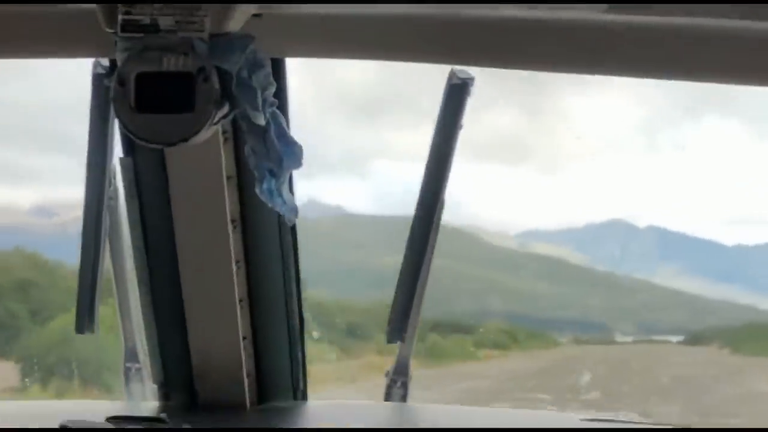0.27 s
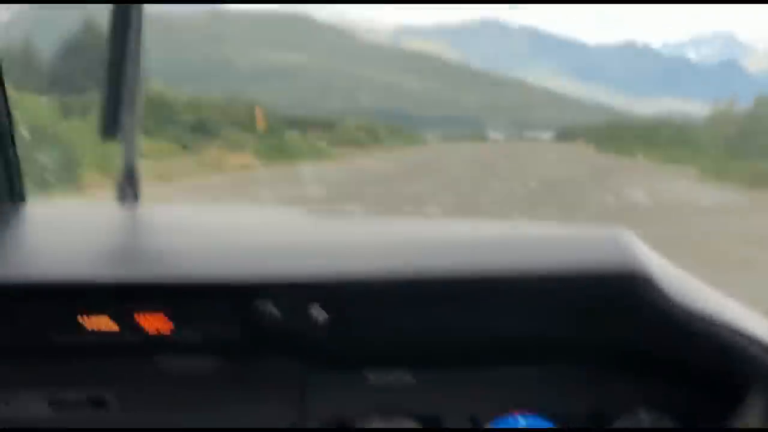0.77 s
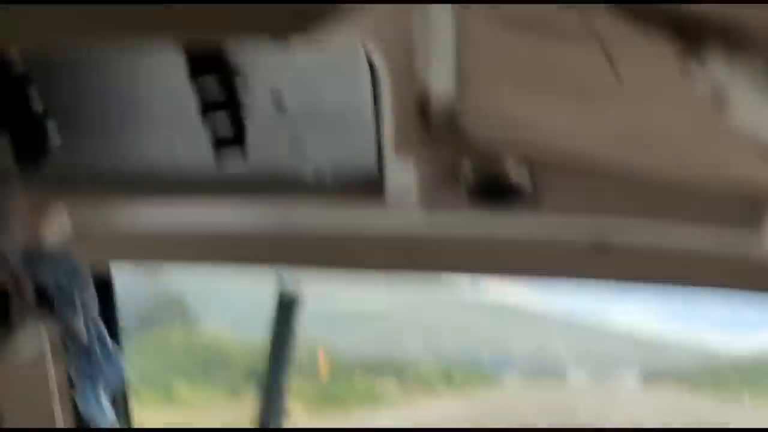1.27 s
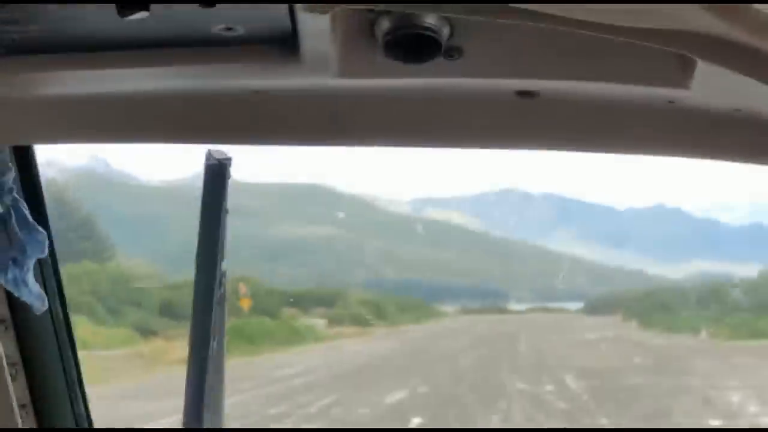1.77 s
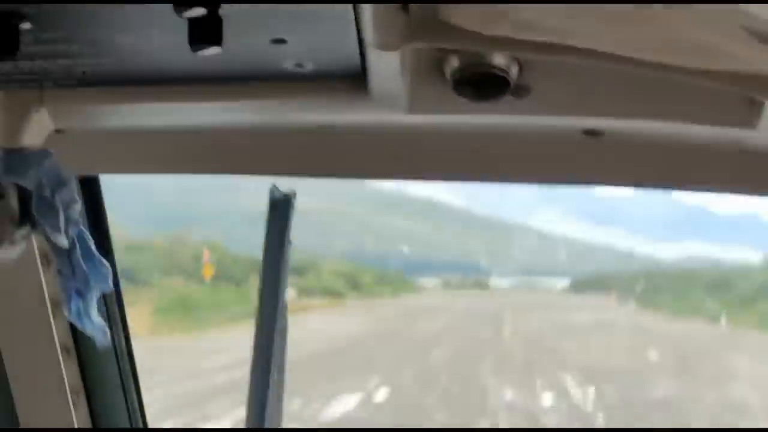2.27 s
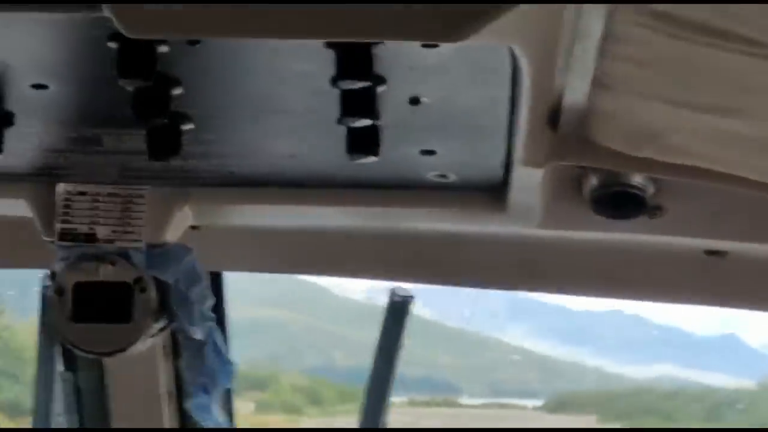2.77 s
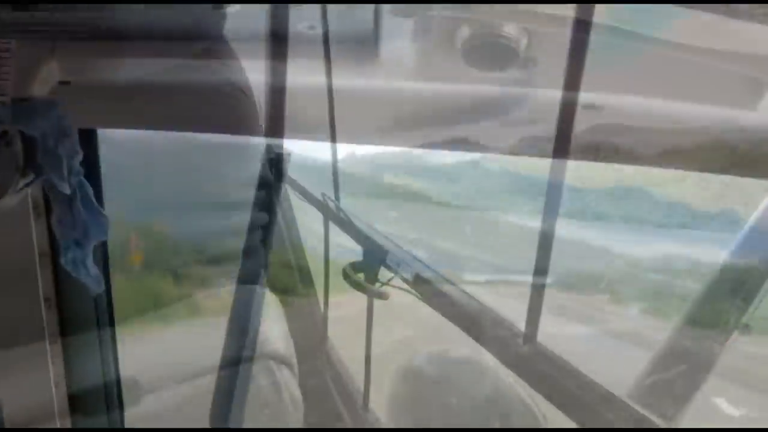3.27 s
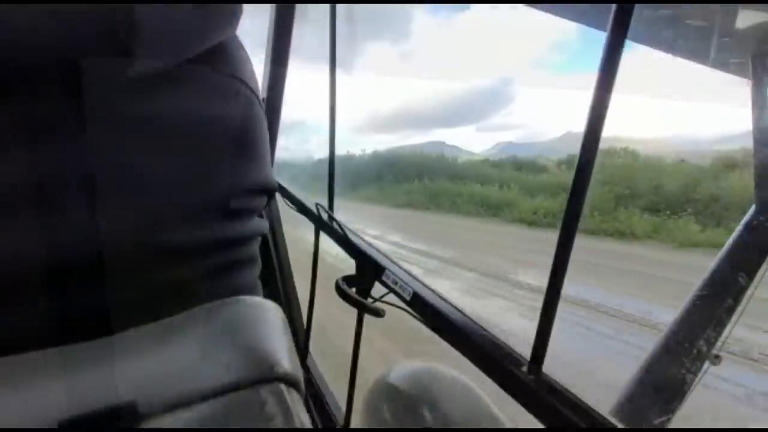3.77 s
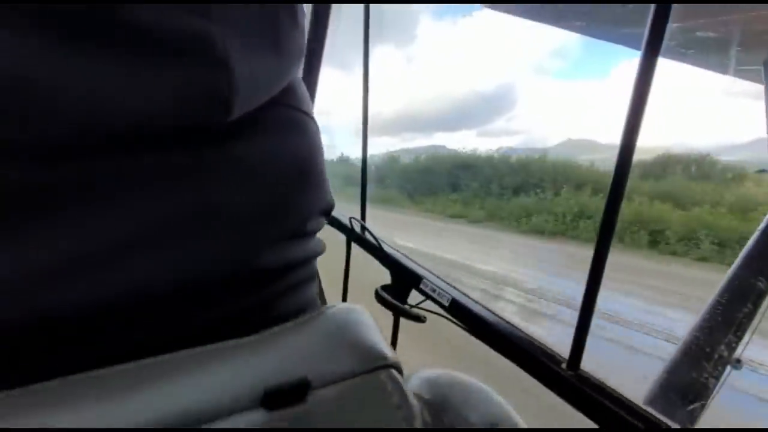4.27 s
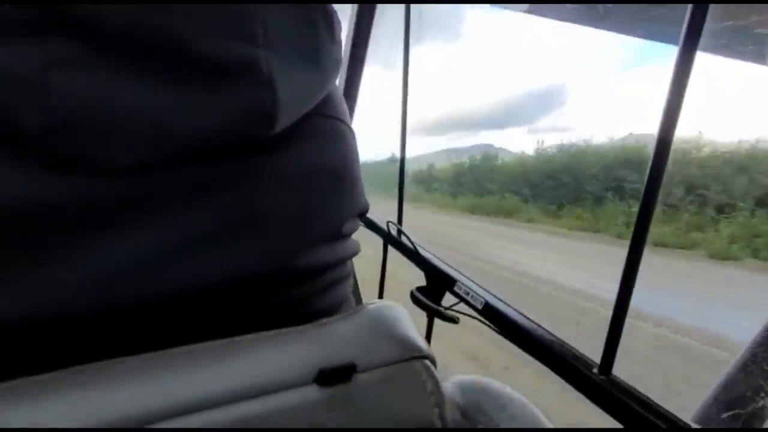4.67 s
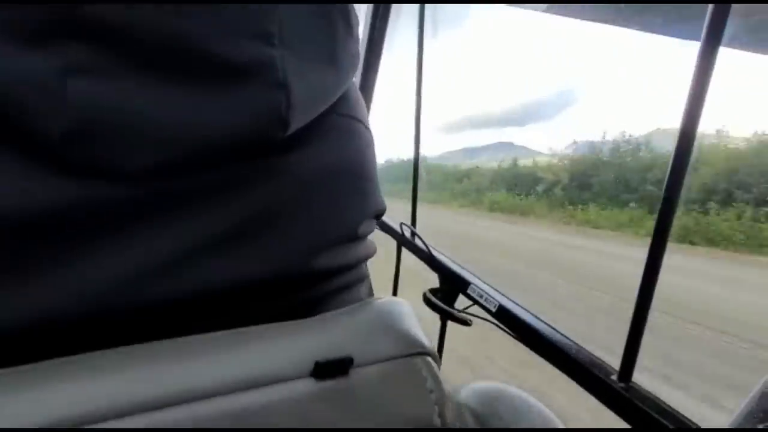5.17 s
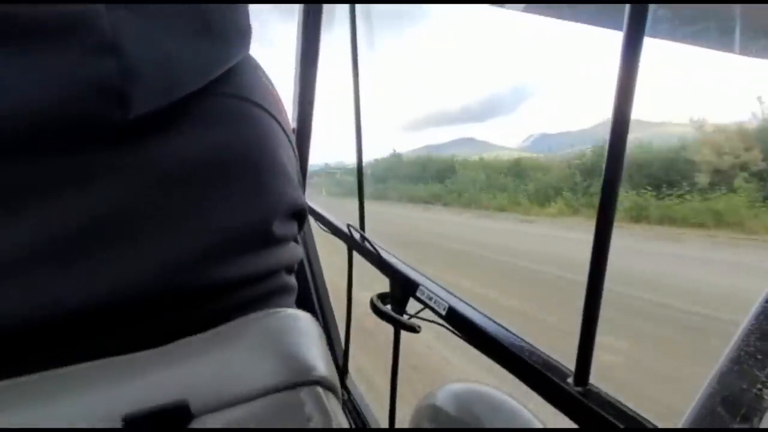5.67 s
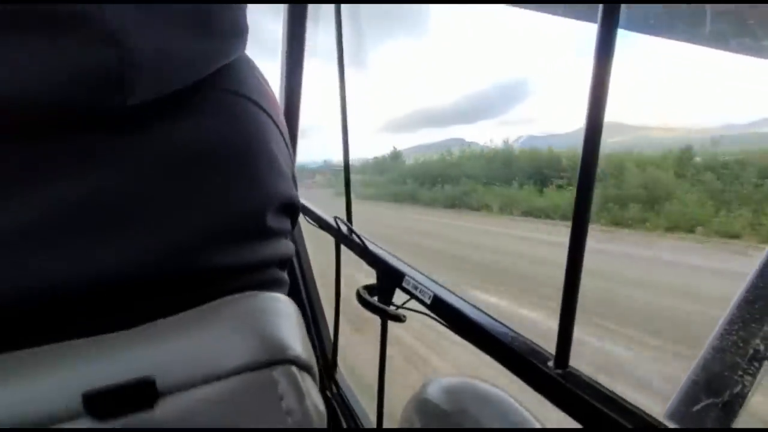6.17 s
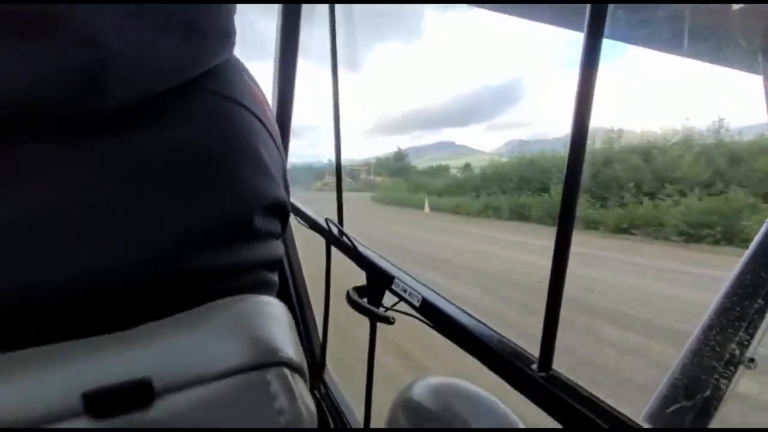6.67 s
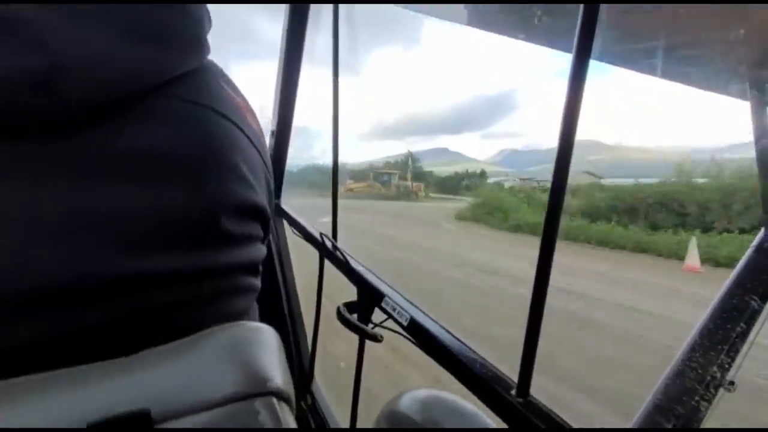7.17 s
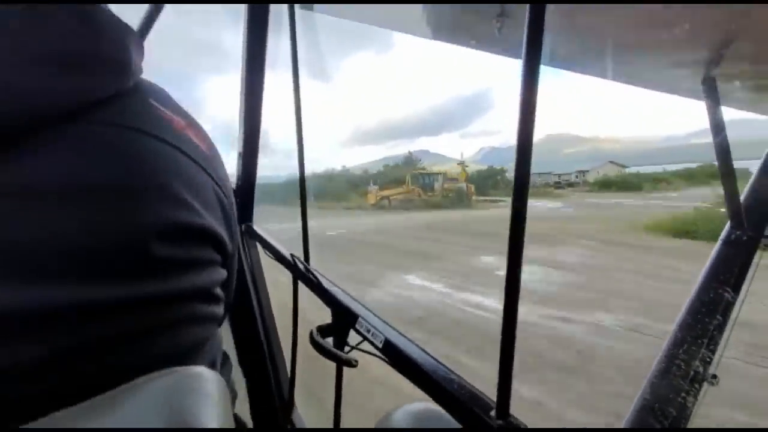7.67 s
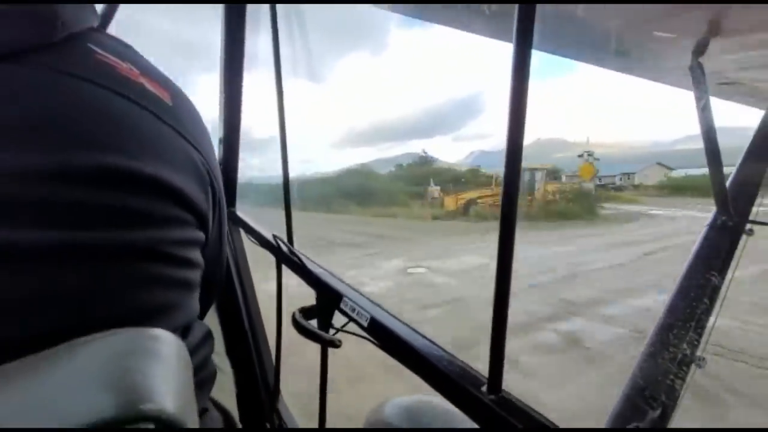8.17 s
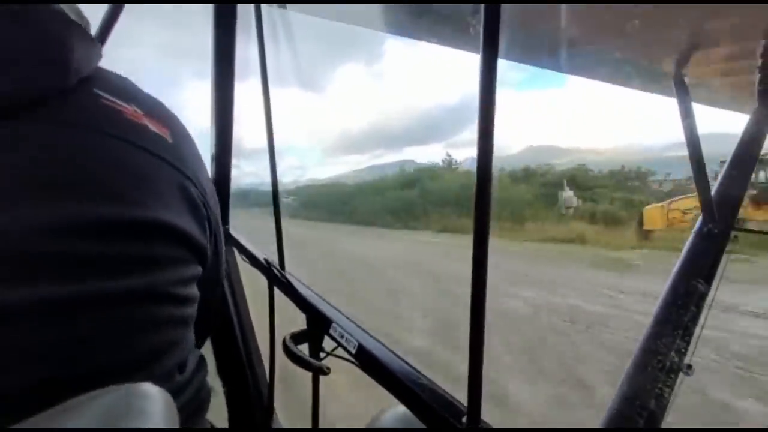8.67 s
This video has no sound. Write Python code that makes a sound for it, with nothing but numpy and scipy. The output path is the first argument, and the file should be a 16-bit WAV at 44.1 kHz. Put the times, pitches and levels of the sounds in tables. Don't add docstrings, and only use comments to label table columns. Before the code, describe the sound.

A small plane rumbles over gravel with a stuttering horn and rattling fittings, then blends into a loud full-power engine drone with grit ticking.

```python
import sys
import numpy as np
from scipy import signal
from scipy.fft import rfft, irfft, next_fast_len
from scipy.io import wavfile
from scipy.ndimage import uniform_filter1d, map_coordinates

SR = 44100
rng = np.random.default_rng(int(sys.argv[2]) if len(sys.argv) > 2 else 0)


def store_wav(level_fs):
    pcm = np.round(np.clip(np.atleast_2d(level_fs), -1, 1) * 32767)
    wavfile.write(sys.argv[1], SR, pcm.T.astype(np.int16))


def convert_level_to_amplitude(level_db):
    exponent = np.asarray(level_db, float) / 20
    return 10 ** exponent


N = 393813

# [start t/s, end t/s]
DISSOLVE = (2.88, 3.81)

# [t/s, f/Hz]
CYCLE_RATE = [(3, 19.62), (3.5, 19.66), (4.1, 19.82), (4.7, 19.89), (5.9, 19.93), (7.1, 19.95),
              (8.93, 20.06)]
# [multiple of the cycle, left level/dB, right level/dB]
CABIN_ORDERS = [(2, -38, -35), (3, -35, -36), (4, -8.5, -9.5), (6, -33, -31), (7, -28, -27),
                (8, -33, -31.5), (9, -32, -33), (10, -38.5, -36.5), (12, -29.5, -27), (14, -33, -28.5),
                (15, -31, -32.5), (16, -32, -27.5), (17, -33.5, -30.5), (19, -34, -36.5), (20, -33, -32),
                (21, -36, -44), (24, -50, -36.5), (25, -35.5, -45.5), (26, -35.5, -38), (27, -43, -36),
                (28, -32.5, -29.5), (30, -38, -34.5), (31, -40, -37), (34, -49, -42), (38, -45, -44),
                (43, -48, -49), (61, -49, -43)]
# [multiple of the cycle, level/dB]
PANEL_ORDERS = [(70, -55), (75, -53), (77, -52), (81, -52), (87, -56), (92, -52), (95, -53), (100, -58),
                (104, -53), (119, -59), (128, -59), (130, -59), (140, -62)]
FIRING = [
    (0, 0.74),
    (.4, 0.56),
    (.62, .3),
    (.9, 1),
]
# [f/Hz, level/dB per Hz]
AIRFRAME = [(8, -11), (28, -16), (40, -3), (65, -2.5), (140, 0), (205, -4), (270, 2.5), (340, -1),
            (420, -4.5), (600, -8), (700, -10.5), (950, -18), (1060, -20.5), (1170, -14.5), (1290, -19.5),
            (1400, -31), (1800, -53.5)]
# [f/Hz, level/dB per Hz]
SLIPSTREAM = [(760, -20), (1300, -3), (1380, -6.5), (1550, -0.5), (1710, -5), (2040, -6), (2540, -8.5),
              (3480, -15.5), (6810, -23), (7800, -23), (8750, -26), (11700, -22.5), (15100, -29),
              (15900, -22)]
# [f/Hz, lead/rad]
PORT_LEAD = [(60, 0.3), (300, 0.11), (600, 1.1), (1000, 0.76), (1300, 1.74), (1800, 4.74), (2300, 6.15),
             (3000, 9.3)]
# [f/Hz, correlation]
ALIKE_RUN = [ (60, 0.9), (300, 0.84), (450, 0.41), (650, 1), (1000, 0.35), (1350, 0.68), (2000, 0.26),
             (3500, 0.066), (15000, 0.031)]
# [f/Hz, level/dB]
LEAN_RUN = [(60, -14), (130, 4), (290, -0.5), (640, -3.5), (1410, -8), (3100, 1), (6820, 2), (15000, 0)]
# [t/s, peak level/dB]
TICKS = [(3.398, -28), (3.45, -31), (3.592, -35), (3.649, -32), (3.854, -33), (4.417, -35), (4.971, -41),
         (6.067, -31), (6.249, -33), (6.568, -36), (7.179, -33), (7.271, -34), (7.733, -36), (7.877, -38),
         (7.931, -32), (8.166, -31), (8.227, -25), (8.717, -34), (8.864, -23)]
# [f/Hz, level/dB per Hz]
GRIT = [(3000, -40), (6000, -12.0), (11000, 1), (15800, -7.5)]

# [multiple of the pitch, level/dB]
REED = [(2, -50), (2.5, -51), (3, -49), (4, -50), (5, -56), (6, -52), (7, -60), (8, -62), (10, -69),
        (13, -65), (14, -62), (15, -63), (17, -67), (19, -65), (20, -69)]
# [start t/s, end t/s]
HORN_STICKS = (.305, .38)
# [t/s, blade rate f/Hz, load level/dB]
BLADES = [(0, 85.77, -0.5), (.4, 84.3, 1), (.55, 83.46, -7.5), (1.05, 82.97, -9.5), (1.18, 81.5, -6),
          (1.62, 75.68, -0.5), (1.97, 67.37, -3.5), (2.2, 63.9, -6), (2.6, 59.78, -9.5)]
# [f/Hz, level/dB]
CABIN_ANSWER = [(65, -18), (85, -19), (130, -21), (160, -33), (168, -14), (190, -27), (222, -18),
                (255, -27), (325, -37), (342, -26)]
# [t/s, peak level/dB, pitch f/Hz]
RUTS = [(0.367, 0, 84.5), (0.418, 1.5, 150), (0.479, -2.5, 86.5), (0.699, 5, 94.2), (0.744, -28, 65),
        (0.839, -1, 122.5), (1.311, 0, 97.6), (1.389, -2, 83.4), (1.509, 3, 55), (1.919, 3, 101.4),
        (1.979, 0.5, 137), (2.219, -2.5, 65.5), (2.68, -16, 56.72), (2.861, 0.5, 53.8), (3.2, -10, 64.9),
        (3.501, -4, 73.6)]
# [t/s, high level/dB, low level/dB, length/s]
RATTLES = [(0.385, -51, -40, 0.033), (0.438, -40, -46, .012), (.48, -49, -55, .02), (.546, -47, -55, .01),
           (0.707, -45, -50, 0.0036), (0.708, -49, -39.5, 0.025), (0.74, -54, -44, .03),
           (1.19, -47, -56, .008), (1.262, -56, -56, .01), (1.312, -52, -56, 0.0054),
           (1.33, -47, -37, 0.017), (1.342, -55, -46, .03), (1.39, -50, -42.5, 0.051),
           (1.506, -48, -32, .034), (1.524, -45, -39, .01), (1.555, -44, -38, .024),
           (1.617, -43, -57, .004), (1.841, -54, -46, .01), (1.921, -44, -50, .008),
           (1.924, -55, -40, .025), (1.962, -52, -40.5, .025), (2.28, -58, -62, .004),
           (2.295, -45, -52, 0.0091), (2.365, -59, -60, .004), (2.734, -55, -60, 0.0054),
           (2.963, -56, -60, .012), (3.193, -49, -55, .01), (3.253, -54, -51, 0.015)]
# [f/Hz, level/dB per Hz]
CLATTER = [(350, -30), (600, -3), (900, 0), (2000, -5), (4000, -11), (6500, -22), (9000, -40)]
# [f/Hz, level/dB, t60/s]
BUCKLE_MODES = [(6170, -18, 0.096), (7000, -2, 0.12), (9351, -6, 0.36), (11750, -6, 0.08),
                (13680, -26, 0.28)]
# [t/s, level/dB]
BUCKLE_HIT = (1.562, -40.5)

# [t/s, level/dB]
GRAVEL = [(0, -21.5), (.45, -14.5), (.54, -21.5), (.75, -18), (.82, -27.5), (1.0, -25.5), (1.2, -20.5),
          (1.34, -11.5), (1.52, -14), (1.6, -16), (1.8, -18.5), (1.93, -10), (2.19, -17.5), (2.35, -20.5),
          (2.6, -21), (2.85, -21), (3.05, -23.5), (3.2, -17.5)]
# [f/Hz, level/dB per Hz]
BOOM = [(8, -20), (27, -17), (37, 7), (50, 11), (72, 12.5), (100, -16), (130, -69)]
# [f/Hz, level/dB per Hz]
RUMBLE = [(60, -48), (95, 6), (130, 2), (230, -0.5), (330, -7.5), (450, -24), (700, -59)]
# [f/Hz, level/dB per Hz]
ROAR = [(210, -25), (350, -6.5), (385, -4), (488, -7), (767, -16), (1190, -22), (1940, -20.5),
        (2910, -31.5), (3910, -31), (6000, -43.5), (7800, -75), (13200, -120)]
# [f/Hz, level/dB per Hz]
HISS = [(3500, -24), (5000, -2.5), (6500, -3.5), (8700, -2.5), (11500, 0.5), (14000, -2), (15900, -13)]
# [start t/s, end t/s]
THRUST_OFF = (0.36, 0.53)
# [f/Hz, correlation]
ALIKE_ROLL = [(60, 0.88), (240, 0.91), (950, 0.24), (3770, -0.22), (15000, -0.05)]
# [f/Hz, level/dB]
LEAN_ROLL = [(60, -3), (180, -2.0), (550, 0), (1650, 2), (4970, 5), (15000, 0)]


def unit(x):
    return x / np.sqrt(np.mean(x ** 2) + 1e-20)


def along(points, hz):
    f, v = np.transpose(points)
    return np.interp(np.log(hz + 1), np.log(f + 1), v)


def curves(rows):
    s, *cols = np.transpose(rows)
    return [np.interp(np.arange(N) / SR, s, c) for c in cols]


def wobble(rate, size=N):
    coarse = np.arange(0, size + 64, 64)
    knots = rng.standard_normal(int(size * rate / SR) + 4)
    return np.interp(np.arange(size), coarse, map_coordinates(knots, [coarse * rate / SR]))


def filtered(x, response):
    m = next_fast_len(N + 8192)
    return irfft(rfft(x, m) * response(np.fft.rfftfreq(m, 1 / SR)), m)[..., :N]


def rush(spectrum, alike, lean, patchy_db):
    z = signal.stft(rng.standard_normal((2, N)), nperseg=512)[2]
    field = uniform_filter1d(rng.standard_normal(z.shape[1:]), size=8, axis=0)
    field = uniform_filter1d(field, size=6, axis=1)
    pair = signal.istft(z * convert_level_to_amplitude(patchy_db * unit(field)), nperseg=512)[1][:, :N]

    def mid_side(hz):
        turn = np.arccos(np.clip(along(alike, hz), -1, 1)) / 2
        return convert_level_to_amplitude(along(spectrum, hz)) * [np.cos(turn), np.sin(turn)]

    mid, side = filtered(pair, mid_side)
    leaning = lambda hz: convert_level_to_amplitude(along(lean, hz) * np.array([[.5], [-.5]]))
    return unit(filtered(np.array([mid + side, mid - side]), leaning))


def bursts(events):
    env, t = np.zeros(N + SR), np.arange(SR // 4) / SR
    for s, db, t60 in events:
        env[round(s * SR):][:len(t)] += convert_level_to_amplitude(db - 60 * t / max(t60, .003)) * (1 - np.exp(-t / 0.00073))
    return env[:N]


def held(events, edge_s):
    env = np.zeros(N)
    for start, end, db in events:
        env[round(start * SR):round(end * SR)] += convert_level_to_amplitude(db)
    fall = np.exp(-np.arange(SR // 20) / (edge_s * SR))
    return signal.fftconvolve(env, fall / fall.sum())[:N]


def engine():
    tone_db, frame_db, stream_db = -10, -22.5, -44.5
    gathered_db = 0.48 * (np.arange(N) / SR - 4)
    frame_db, stream_db = frame_db + gathered_db, stream_db + gathered_db
    cycles = np.cumsum(curves(CYCLE_RATE)[0]) / SR
    heard = slice(round(DISSOLVE[0] * SR), N)
    size = N - heard.start

    shaft = [(k, *(-48.5 + 1.5 * rng.standard_normal(2))) for k in range(36, 68, 2)]
    panel_orders = [(k, db + 3, db + 3) for k, db in PANEL_ORDERS]
    tones = np.zeros((2, N))
    for k, left_db, right_db in CABIN_ORDERS + shaft + panel_orders:
        loose = .12 if k == 4 else 1
        start, lag = rng.uniform(0, 2 * np.pi), (k - 4) / 110 * rng.standard_normal()
        wander = loose * (.3 * wobble(4, size) + k / 70 * wobble(14, size))
        phase = 2 * np.pi * k * cycles[heard] + start + wander
        if k == 4:
            level_db = tone_db + 12.5 + .4 * wobble(1.5, size)
        else:
            level_db = frame_db[heard] + 24.7
        swell = convert_level_to_amplitude(level_db + loose * 2 * wobble(5, size))
        ceiling_db = -32 if k < 3.5 else 0
        sides = convert_level_to_amplitude(np.minimum([[left_db], [right_db]], ceiling_db))
        angle = (phase % (2 * np.pi) + [[lag], [-lag]]).astype(np.float32)
        tones[:, heard] += swell * sides * np.sin(angle)

    knock = sum(strength * np.exp(-((cycles - place) % 1) / 0.06) for place, strength in FIRING)
    frame = rush(AIRFRAME, ALIKE_RUN, LEAN_RUN, 1.6)
    panels = filtered(frame, lambda hz: 1 / (1 + (900 / (hz + 1)) ** 4))
    frame = frame + 2.2 * knock * panels
    air = rush(SLIPSTREAM, ALIKE_RUN, LEAN_RUN, 0.84)
    stream = unit((1 + 0.76 * knock) * convert_level_to_amplitude(0.47 * wobble(14)) * air)
    return tones + convert_level_to_amplitude(frame_db) * frame + convert_level_to_amplitude(stream_db + 11.5) * stream


def stall_horn():
    horn_hz, scoop, scoop_s = 785, .03, .008
    period_s, slows_s, closed_s = .05, .00018, .027
    horn_db, fade_s, fade_db_s = 1.5, 0.35, 39
    flutter = np.arange(14)
    on = flutter * (period_s + slows_s * flutter)
    level_db = horn_db - fade_db_s * np.maximum(on - fade_s, 0)
    stick, release = HORN_STICKS
    spans = [(s, s + closed_s, db) for s, db in zip(on, level_db) if not stick <= s < release]
    spans.append((stick, release, horn_db))

    t = np.arange(SR) / SR
    since = t - on[np.searchsorted(on, t, 'right') - 1]
    pitch_hz = horn_hz * (1 - scoop * np.exp(-since / scoop_s - t / .25))
    turn = 2 * np.pi * np.cumsum(pitch_hz) / SR + 0.078 * wobble(35, size=SR)

    def overtone(k, db):
        level = convert_level_to_amplitude(db + 5 + 1.6 * wobble(25, size=SR))
        return level * np.sin(k * turn + .4 * wobble(10, size=SR))

    ears = [sum(overtone(k, db) for k, db in REED) for _ in range(2)]
    return held(spans, .003) * np.pad(ears, ((0, 0), (0, N - SR)))


def propeller():
    hz, load_db = curves(BLADES)
    turn = 2 * np.pi * np.cumsum(hz) / SR
    tones = np.zeros(N)
    for k in range(1, 5):
        level_db = load_db + along(CABIN_ANSWER, k * hz) + 3 + 1.1 * wobble(8)
        tones += convert_level_to_amplitude(level_db) * np.sin(k * turn + .12 * wobble(6))
    return tones * (np.arange(N) < 2.8 * SR) * convert_level_to_amplitude([[-.8], [.8]])


def ruts():
    out, t = np.zeros(N + SR), np.arange(SR // 4) / SR
    for s, db, hz in RUTS:
        ring = convert_level_to_amplitude(db - 5.5 - 60 * t / 0.21) * (1 - np.exp(-t / 0.0075))
        out[round(s * SR):][:len(t)] += ring * np.sin(2 * np.pi * hz * t)
    return out[:N] * convert_level_to_amplitude([[-.7], [.7]])


def rattles():
    crackle = unit(convert_level_to_amplitude(3 * np.array([wobble(400), wobble(400)])))
    high_env = held([(s, s + span, db) for s, db, _, span in RATTLES], 0.0016)
    low_env = held([(s, s + span, db) for s, _, db, span in RATTLES], 0.0055)
    high = high_env * rush(HISS, ALIKE_ROLL, LEAN_ROLL, 2.3)
    low = low_env * rush(CLATTER, ALIKE_ROLL, LEAN_ROLL, 2)
    hit_s, hit_db = BUCKLE_HIT
    t = np.maximum(np.arange(N) / SR - hit_s, 0)
    ring = sum(convert_level_to_amplitude(db - 60 * t / min(t60, .1)) * np.sin(2 * np.pi * hz * t) for hz, db, t60 in BUCKLE_MODES)
    return (high + low) * crackle + convert_level_to_amplitude(hit_db) * ring


def stones():
    draws = rng.random((700, 2))
    spray = [(3.1 + 5.8 * u, -50 + min(-5 * np.log(1 - v), 14), .012) for u, v in draws]
    hits = [(s, db, .015) for s, db in TICKS]
    return bursts(spray + hits) * rush(GRIT, ALIKE_RUN, LEAN_RUN, 3.2)


def wheels():
    boom_db, jolt_db, jolt_rise_s = -6, -22.5, 0.042
    gravel_db, = curves(GRAVEL)
    t = np.arange(N) / SR
    thrust = np.interp(t, THRUST_OFF, (1, 0))
    jolts = np.zeros(N)
    for s, db, _ in RUTS:
        since = np.maximum(t - s, 0) / jolt_rise_s
        jolts += convert_level_to_amplitude(jolt_db + 0.23 * db) * since * np.exp(1 - since)
    roar_db = -25 + 0.32 * gravel_db - 1.67 * t + 5.5 * thrust
    hiss_db = np.maximum(-51.5 - 5.5 * t + 5.5 * thrust, -77)
    layer = lambda spectrum, patchy_db: rush(spectrum, ALIKE_ROLL, LEAN_ROLL, patchy_db)
    boom = (convert_level_to_amplitude(gravel_db + boom_db) + jolts) * layer(BOOM, 0.97)
    rumble = convert_level_to_amplitude(gravel_db + 1.2 * wobble(25.55)) * layer(RUMBLE, 1.16)
    roar = convert_level_to_amplitude(roar_db + 0.67 * wobble(30.07)) * layer(ROAR, 1.06)
    hiss = convert_level_to_amplitude(hiss_db + .8 * wobble(40)) * layer(HISS, 1.2)
    return boom + rumble + roar + hiss


def scene():
    fade = np.interp(np.arange(N) / SR, DISSOLVE, (0, 1))
    ports = lambda hz: np.exp(.5j * along(PORT_LEAD, hz) * np.array([[1], [-1]]))
    take_off = filtered(engine(), ports) + stones()
    roll_out = stall_horn() + propeller() + ruts() + rattles() + (1 - fade ** 2) * wheels()
    return fade * take_off + roll_out


def low_pass(x):
    return signal.sosfilt(signal.butter(12, 16190, fs=SR, output="sos"), x)


def record(dry):
    capped = dry / (1 + np.abs(dry / .98) ** 8) ** (1 / 8)
    mix = filtered(capped, lambda hz: hz < 15800)
    return low_pass(mix)


dry = scene()
out = record(dry)
store_wav(out)
```